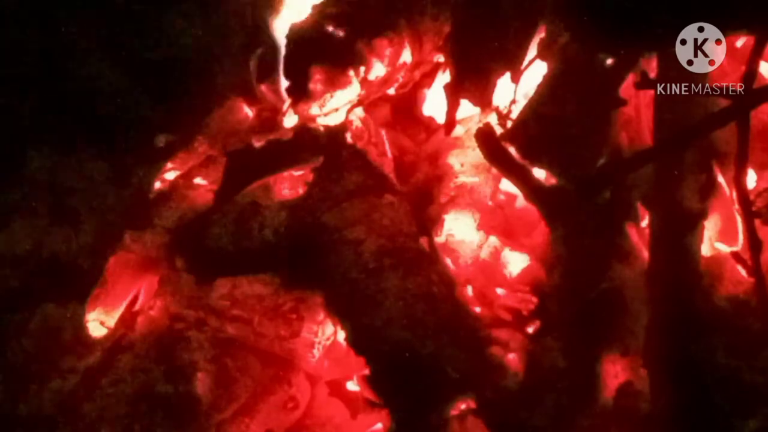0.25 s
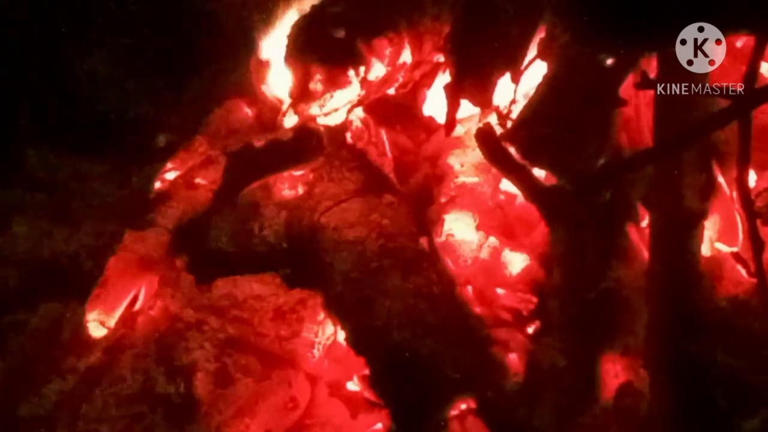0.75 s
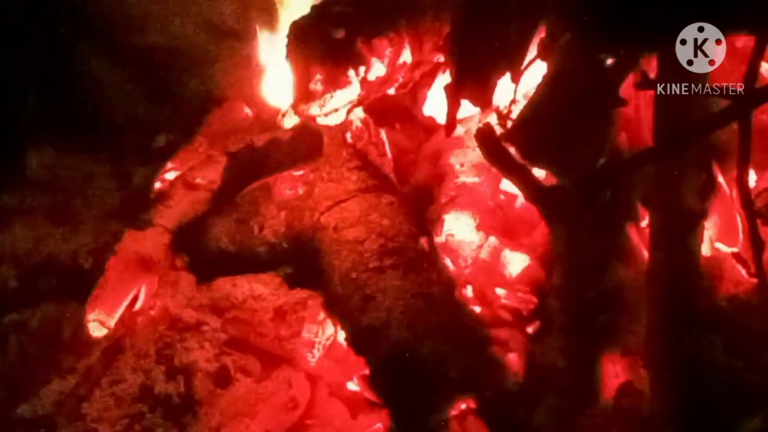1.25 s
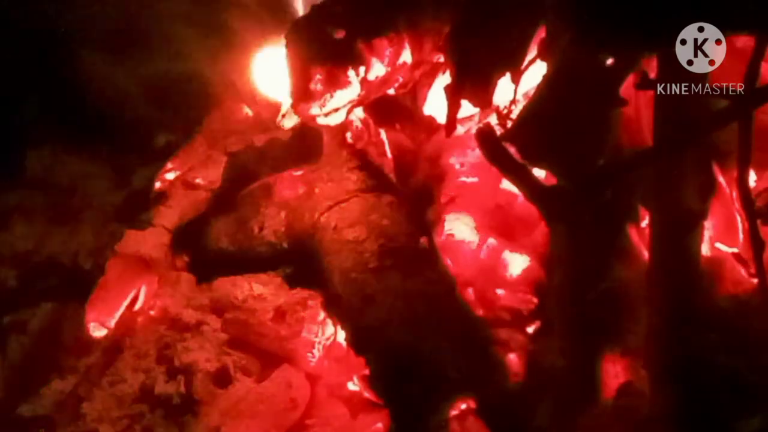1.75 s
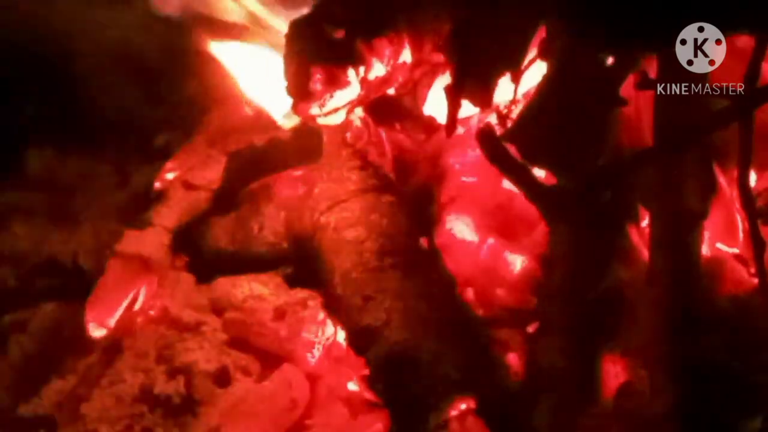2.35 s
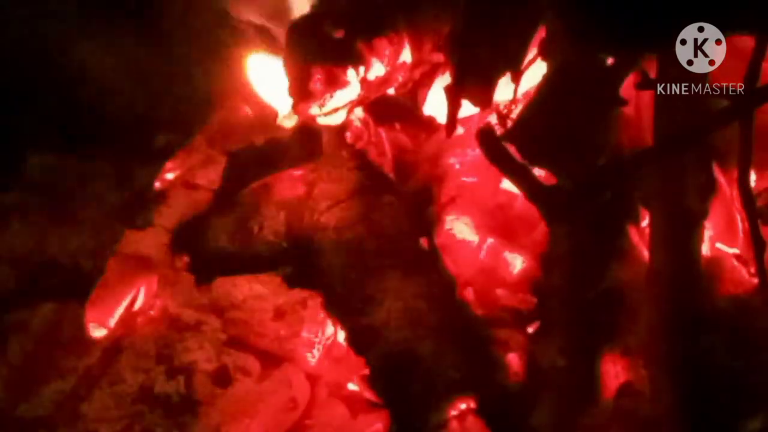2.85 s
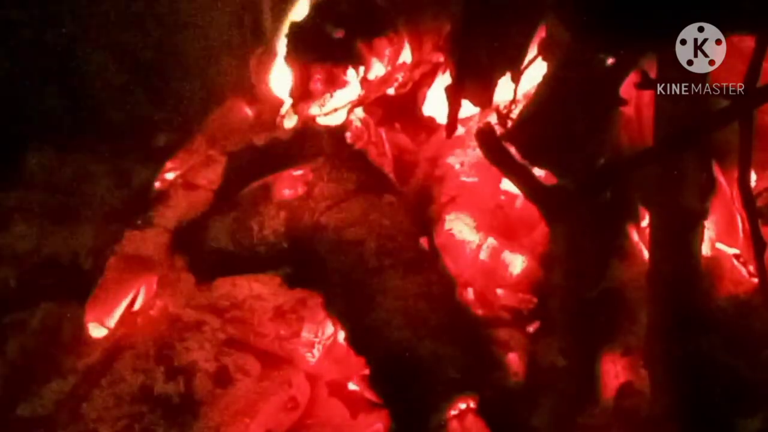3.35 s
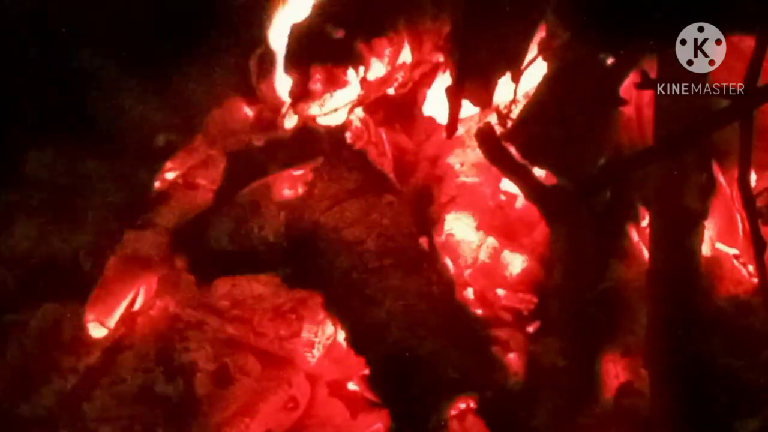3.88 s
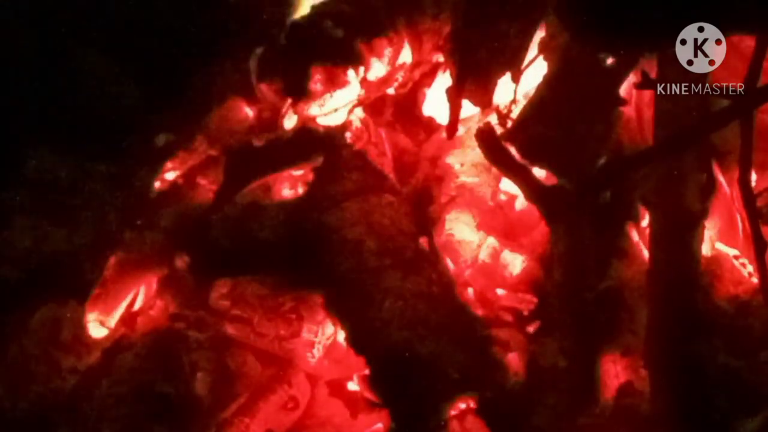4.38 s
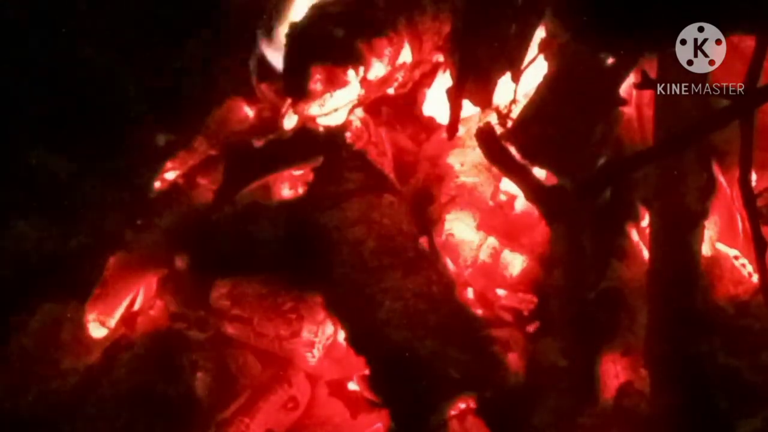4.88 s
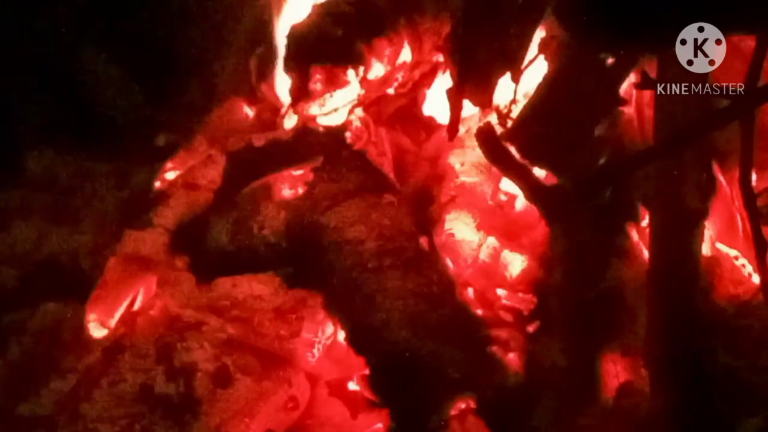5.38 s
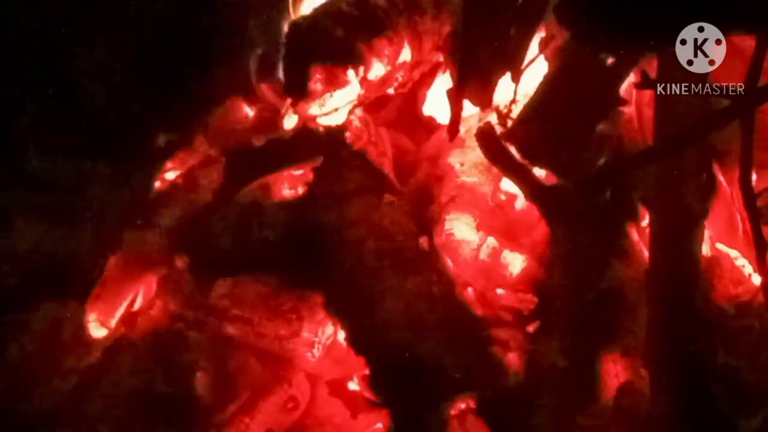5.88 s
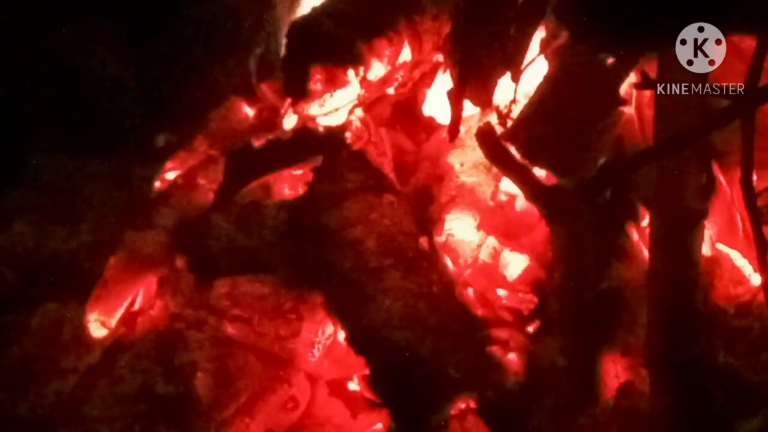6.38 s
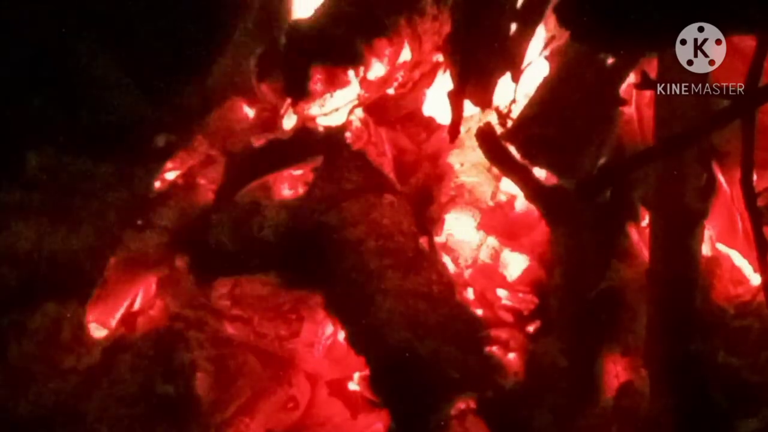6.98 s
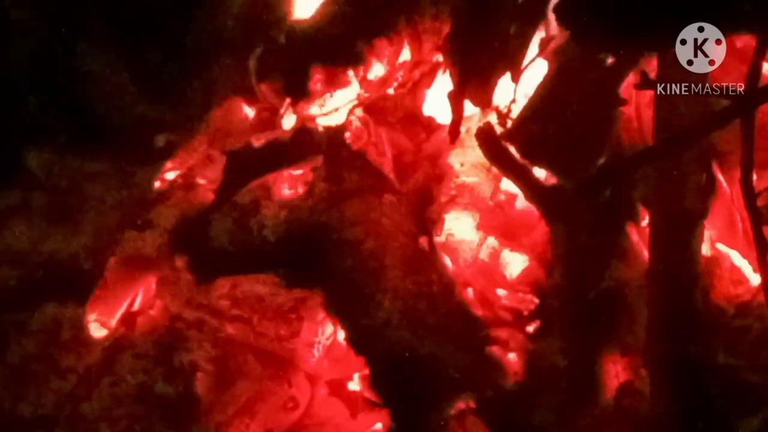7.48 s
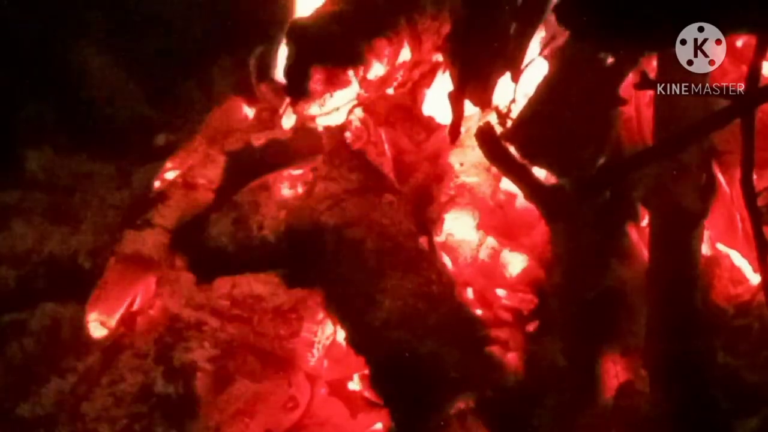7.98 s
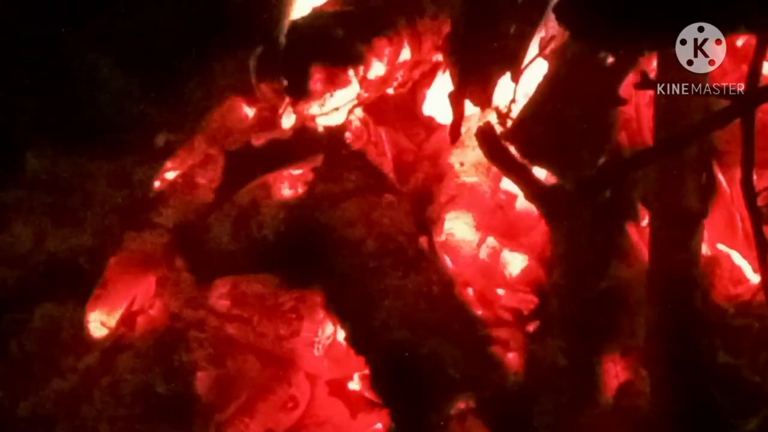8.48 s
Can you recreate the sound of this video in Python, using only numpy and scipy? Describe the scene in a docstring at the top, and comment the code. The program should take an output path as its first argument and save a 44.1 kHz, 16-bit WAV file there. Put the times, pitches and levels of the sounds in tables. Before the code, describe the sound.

A low campfire pops and crackles over a soft sizzle while crickets chirp steadily in the night woods.

```python
"""A low campfire in the woods at night, one microphone close to the embers.
Wood fibres snap in pops and ticks, and the ground and the trees throw each crack back.
Gas seeping from the hot wood sizzles, sap spits, and a small flame rumbles and flaps in faint night air.
A near cricket scrapes its wings in about three chirps a second, a quieter neighbour keeps step,
and a far chorus blurs into a trill among the trunks."""
import sys
import numpy as np
from scipy import signal
from scipy.fft import rfft, irfft
from scipy.io import wavfile
from scipy.ndimage import uniform_filter1d

SR = 44100
rng = np.random.default_rng(int(sys.argv[2]) if len(sys.argv) > 2 else 0)


def write(x):
    x = np.atleast_2d(x).T
    wavfile.write(sys.argv[1], SR, np.round(np.clip(x, -1, 1) * 32767).astype(np.int16))


N = 385434

# colour of escaping gas: (frequency [Hz], gain [dB])
HISS_COLOUR = [(2500, -26), (4000, -21), (4800, -9), (6200, -2), (7100, -0.5), (7650, -16), (8200, 0.5),
               (9200, -2), (11500, -5.5), (15500, -5.5)]


def undb(db):
    """Decibels to gain."""
    return np.exp(np.asarray(db) * (np.log(10) / 20))


def unit(x):
    """Scale to rms 1."""
    return x / np.sqrt(np.mean(x ** 2) + 1e-20)


def colour(x, points, size=4096):
    """Causal filter through (frequency [Hz], gain [dB]) points; white noise keeps its power."""
    hz, db = np.transpose(points)
    f = np.fft.rfftfreq(size, 1 / SR)
    gain = unit(undb(np.interp(np.log(f + 1), np.log(hz), db)))
    cepstrum = irfft(np.log(gain), size)
    cepstrum[1:size // 2] *= 2  # fold to minimum phase
    cepstrum[size // 2 + 1:] = 0
    return signal.oaconvolve(x, irfft(np.exp(rfft(cepstrum)), size))[:len(x)]


def walk(rate):
    """Random levels held 1 / rate s and smoothed twice, at rms 1."""
    k = max(int(SR / rate), 1)
    steps = np.repeat(rng.standard_normal(N // k + 1), k)
    return unit(uniform_filter1d(uniform_filter1d(steps, k), k)[:N])


def add(out, s, sound):
    """Mix a sound in at time s."""
    i = int(round(s * SR))
    a, b = max(i, 0), min(i + len(sound), N)
    if b > a:
        out[a:b] += sound[a - i:b - i]


def trees(x, t60, delay, grain_db):
    """Trunks and leaves scatter uneven, dying echoes back to the microphone; t60 and delay in s."""
    t = np.arange(SR // 2) / SR
    echoes = rng.standard_normal(len(t)) * undb(grain_db * rng.standard_normal(len(t)))
    echoes *= np.exp(-np.log(1000) * t / t60) * np.clip(t / delay - 1, 0, 1)
    return signal.oaconvolve(x, echoes / np.linalg.norm(echoes))[:N]


def scatter(x, t60, delay):
    """Countless echoes of a crack merge into noise that follows its fading energy."""
    t = np.arange(SR) / SR
    fade = undb(-60 * t / t60) ** 2 * np.clip(t / delay - 1, 0, 1)
    energy = signal.fftconvolve(x ** 2, fade / fade.sum())[:N]
    return np.sqrt(np.maximum(energy, 0)) * rng.standard_normal(N) * undb(1.87 * walk(350))


def ring(hz, cycles):
    """A struck splinter: a tone that swells and dies in a few cycles, with the energy of 1 ms at rms 1."""
    turns = hz * np.arange(SR // 50) / SR
    x = np.sin(2 * np.pi * turns) * np.exp(-turns / cycles) * np.minimum(turns, 1)
    return x * np.sqrt(SR / 1000) / np.linalg.norm(x)


def rustle(low_hz, high_hz, cycles, spread_db, count, pitches=24):
    """Many tiny grains at assorted pitches, smeared by the logs around them into a dry rustle."""
    out = np.zeros(N)
    grains = [ring(hz, cycles) for hz in np.geomspace(low_hz, high_hz, pitches)]
    when, pitch, chance = rng.random((count, 3)).T
    gains = undb(spread_db * np.minimum(-np.log(1 - chance), np.pi))
    for s, k, gain in zip(when * N / SR, (pitch * pitches).astype(int), gains):
        add(out, s, gain * grains[k])
    return unit(out + trees(out, t60=0.088, delay=0.0013, grain_db=1.5))


def gas_flow(attack_s=0.028, release_s=0.059, spurt_fizz_db=-16):
    """Strength of hiss and fizz: a slow seep plus spurts that swell fast and die away."""
    # gas seeping from the wood: (time [s], hiss level [dB], fizz level [dB])
    seep = [(0, -60, -83), (0.85, -61.5, -79.5), (1.1, -54, -73.5), (1.28, -53.5, -67.5), (1.5, -62, -81),
            (2.4, -60, -79), (2.95, -70, -83.5), (3.2, -56, -68), (3.85, -61, -77), (4.25, -57, -66.5),
            (4.45, -55.5, -79.5), (5.5, -60.5, -76), (5.9, -54.5, -67.5), (6.15, -60, -81), (7.2, -61, -78),
            (7.5, -63, -71.5), (7.75, -61.5, -82), (8.7, -63.5, -85.5)]
    # pockets of gas breaking out: (time [s], hiss level [dB])
    pockets = [(0.01, -53), (0.36, -64), (0.52, -54.5), (0.89, -48.5), (1.54, -69), (2.0, -57), (2.25, -50),
               (3.88, -54.5), (4.48, -58), (4.58, -61), (6.23, -49.5), (6.86, -51), (8.03, -50.5),
               (8.32, -57), (8.64, -56.5)]
    t = np.arange(N) / SR
    age = t[:SR]
    shape = np.minimum(age / attack_s, 1) * np.exp(-np.maximum(age - attack_s, 0) / release_s)
    spurts = np.zeros(N)
    for start, db in pockets:
        add(spurts, start, undb(db) * shape)
    s, hiss_db, fizz_db = np.transpose(seep)
    hiss_gain = np.hypot(undb(np.interp(t, s, hiss_db)), spurts)
    fizz_gain = np.hypot(undb(np.interp(t, s, fizz_db)), undb(spurt_fizz_db) * spurts)
    return hiss_gain, fizz_gain


def spits(per_s=16, spread_db=4):
    """Sap spits at random: each a bright tick with its own small echo."""
    clicks = np.zeros(N)
    for when, chance in rng.random((int(per_s * N / SR), 2)):
        gain = undb(spread_db * min(-np.log(1 - chance), 2))
        add(clicks, when * N / SR, gain * ring(hz=10000, cycles=1))
    return unit(clicks + colour(scatter(clicks, t60=0.14, delay=0.0022), HISS_COLOUR))


def sizzle(ticks_per_s=80, tick_spread_db=4):
    """Gas hisses from the wood, flickering; bursting cells tick, the charcoal rustles and tinkles."""
    # colour of the fizzing wood: (frequency [Hz], gain [dB])
    fizz_colour = [(700, -9), (1400, 0), (2300, -12), (3400, 0.5), (4600, 16), (7000, -19)]
    hiss_gain, fizz_gain = gas_flow()
    sizes = undb(tick_spread_db * np.minimum(rng.exponential(size=N), 3))
    ticks = sizes * rng.choice([-1, 1], N) * (rng.random(N) < ticks_per_s / SR)
    ticks = undb(-11) * unit(colour(ticks, [(3000, -33), (6000, -15), (9000, 13)]))
    grit = undb(-5) * rustle(low_hz=3960, high_hz=6150, cycles=2.7, spread_db=6.5, count=2200)
    hiss = colour(rng.standard_normal(N) * undb(walk(45) - 1.5), HISS_COLOUR)
    sap = undb(-7) * spits()
    fizz = undb(-6) * colour(rng.standard_normal(N) * undb(6.6 * walk(40)), fizz_colour)
    flakes = undb(-4) * rustle(low_hz=2090, high_hz=6450, cycles=2.2, spread_db=1.5, count=2600)
    tinkle = undb(-5.5) * rustle(low_hz=2600, high_hz=5600, cycles=10, spread_db=3.8, count=800)
    return hiss_gain * (hiss + ticks + sap) + fizz_gain * (fizz + flakes + grit + tinkle)


def flame(rumble_db=-51, flutter_db=1.53, flap_s=0.057, sputter_db=-82):
    """A small flame close to the microphone rumbles, flaps briefly and sputters softly."""
    # colour of the steady flame: (frequency [Hz], gain [dB])
    rumble_colour = [(20, -35), (35, -24), (50, -11), (70, 1), (88, -3), (115, -0.5), (150, -7.5),
                     (200, -11.5), (250, -20), (320, -26.5), (420, -34.5), (800, -39.5), (2000, -75)]
    # flaps of the flame: (time [s], level [dB])
    flap_peaks = [(0.214, -61), (0.41, -59.5), (0.886, -70), (1.208, -64), (2.094, -63), (2.317, -58),
                  (3.688, -60), (4.307, -60.5), (4.495, -58), (5.563, -59.5), (5.914, -54.5), (6.29, -58.5),
                  (7.55, -58)]
    # colour of a flap: (frequency [Hz], gain [dB])
    flap_colour = [(100, -23), (190, 2.5), (260, 0.5), (340, -6), (450, -19.5), (800, -20.5), (1400, -32),
                   (3000, -49)]
    t = np.arange(N) / SR
    rumble = unit(colour(rng.standard_normal(N), rumble_colour))
    rumble *= undb(rumble_db + flutter_db * walk(15))
    swell = sum(undb(db) / (1 + ((t - s) / flap_s) ** 2 / 2) ** 2 for s, db in flap_peaks)
    flaps = swell * colour(rng.standard_normal(N), flap_colour)
    grains = rustle(low_hz=480, high_hz=1500, cycles=3, spread_db=3.5, count=700)
    sputter = undb(sputter_db + 2 * walk(7)) * grains
    return rumble + flaps + sputter


def night_air(level_db=-73.5):
    """The faint, wavering hush of the woods behind the fire."""
    # colour of the air: (frequency [Hz], gain [dB])
    air_colour = [(500, -9.5), (800, -3), (1200, -3), (2000, -7.5), (4000, -31.5), (15000, -7.5)]
    return colour(rng.standard_normal(N), air_colour) * undb(level_db + walk(13))


def chirp(hz, strokes_per_s=21, stroke_s=0.0252, fall_hz=200, count=4):
    """Wing strokes: the tone sags as the scraper slows along the file; the last stroke drops 5 dB."""
    out = np.zeros(N // 20)
    along = np.arange(int(stroke_s * SR)) / (stroke_s * SR)
    for k, (late, sharp, loud) in enumerate(rng.standard_normal((count, 3))):
        tone_hz = hz + 30 * sharp - fall_hz * (along - .5)
        stroke = np.abs(np.sin(np.pi * along)) ** .5 * np.sin(2 * np.pi * np.cumsum(tone_hz) / SR)
        i = max(int((k / strokes_per_s + .003 * late) * SR), 0)
        out[i:i + len(along)] += stroke * undb(loud - 5 * (k == count - 1))
    return 2 * out


def cricket_beat(first_chirp_s=0.075):
    """The near cricket's rhythm: a running count of chirps at every sample, and the time of each."""
    # its pace: (time [s], rate [chirps/s])
    pace = [(0, 3.241), (2, 3.792), (2.8, 3.05), (4.9, 3.622), (5.5, 3.083), (8.7, 3.119)]
    t = np.arange(N) / SR
    beat = np.cumsum(np.interp(t, *np.transpose(pace))) / SR
    beat -= np.interp(first_chirp_s, t, beat)
    return beat, np.interp(np.arange(int(beat[-1]) + 1), beat, t)


def crickets(wing_hz=6584, drift_hz_per_s=13.26, lead_s=.03, swell_db=4, lag_beats_per_octave=1.9):
    """A near cricket and a neighbour chirp in step; far ones swell with them, blurred by the trees."""
    # the near cricket's effort: (time [s], relative level [dB])
    effort = [(0, -44), (1, -44.5), (1.6, -46.5), (3.6, -49.5), (4, -45.5), (5.6, -46.5), (6.3, -47.5),
              (6.8, -70), (7.6, -47.5), (8.7, -48)]
    # far crickets: (wing tone [Hz], relative level [dB], rate [chirps/s])
    chorus = [(6630, -68.5, 3), (6457, -61.5, 3.1), (6663, -58, 2.7), (6826, -62, 3.1), (6940, -72.5, 4)]
    near, neighbour, far = np.zeros((3, N))
    beat, starts = cricket_beat()
    for s in starts:
        db = np.interp(s, *np.transpose(effort)) + .5 * rng.standard_normal()
        hz = wing_hz + drift_hz_per_s * s + 25 * rng.standard_normal()
        add(near, s, undb(db) * chirp(hz))
        add(neighbour, s - lead_s, undb(db - 16) * chirp(hz=6830, fall_hz=318))
    for hz, db, pace in chorus:
        song = np.zeros(N)
        for s in np.cumsum(1 + 0.13 * rng.standard_normal(32)) / pace - 2 / pace:
            add(song, s, chirp(hz, strokes_per_s=23, stroke_s=0.034, fall_hz=110, count=7))
        lag = lag_beats_per_octave * np.log2(hz / wing_hz)  # higher voices swell later
        swell = undb(swell_db * np.sin(2 * np.pi * (beat - lag)))
        far += undb(db - 0.2) * unit(song * swell)
    near = undb(-9) * (near + trees(near, t60=0.3, delay=0.0047, grain_db=1.0))
    return near + trees(far + neighbour, t60=0.42, delay=0.0014, grain_db=4.5)


def snap(rise_s, decay_s, rattle_s, rattle_db):
    """A fibre snaps: a sudden rough pulse and a short rattle, with the energy of 1 ms at rms 1."""
    t = np.arange(SR // 30) / SR
    shape = np.minimum(t / rise_s, 1) ** 2 * np.exp(-np.maximum(t - rise_s, 0) / decay_s)
    shape += undb(rattle_db) * np.exp(-t / rattle_s) * (t > rise_s)
    x = shape * rng.standard_normal(len(t))
    return x * np.sqrt(SR / 1000) / np.linalg.norm(x)


def embers(bounce_s=0.0069, ring_db_per_octave=3.5):
    """Each pop, a bright crack and a woody body, bounces off the ground and spreads among the trees."""
    # pops: (time [s], crack level [dB], body level [dB], wood ring [Hz], echo relative to the pop [dB])
    pops = [(0.183, -45, -70, 1800, -1), (1.6492, -39, -43.5, 3680, -6.5), (1.7097, -31.5, -78, 3900, -19),
            (2.0067, -45, -75, 4400, -15), (2.27, -45, -72, 4600, -10), (2.4642, -42.5, -60, 1820, -1),
            (2.523, -41.5, -47.5, 3800, 0.5), (2.8164, -38, -80, 1800, -10),
            (3.009, -47.5, -54.5, 2920, 9.5), (3.076, -34, -51, 4400, -7), (3.2432, -36.5, -72, 4100, -12),
            (3.2744, -41.5, -49, 3350, 7.5), (3.32, -38, -46.5, 3300, -8), (3.4792, -35, -43, 4570, -14),
            (3.5077, -42, -68, 3700, -17), (4.0633, -33, -44, 4400, -4), (4.113, -33, -63, 4600, -7),
            (4.862, -23.5, -42.5, 4600, 0), (4.9938, -42, -39.5, 4170, -5), (5.076, -22, -26.5, 3320, -5.5),
            (5.118, -19.5, -21, 5500, -6), (5.124, -21.5, -34.5, 2080, 0), (5.1765, -35, -36.5, 3340, 5),
            (5.183, -31, -39, 3330, 0), (5.357, -32, -74, 4600, -32), (5.5447, -31.5, -41.5, 3800, -5),
            (5.839, -38.5, -44.5, 2960, 0), (5.9923, -32, -45.5, 6800, -2.5), (6.01, -60, -49.5, 2360, 6),
            (6.096, -43.5, -50, 3630, 1), (6.2649, -38.5, -45.5, 2780, 0.5), (6.288, -59, -42.5, 2700, -5),
            (6.3098, -48, -44, 2640, -2), (6.4214, -36.5, -45.5, 2620, -2), (6.5682, -15, -21, 2270, -6),
            (6.5705, -21.5, -31.5, 1370, 2.5), (6.5765, -22, -27.5, 3270, -8),
            (7.2732, -34.5, -45.5, 4360, -4), (7.3723, -31, -42, 1830, -2), (7.463, -36, -47, 4440, 1),
            (7.48, -35, -44, 4560, 1), (7.6458, -37, -53, 4500, -0.5), (7.9764, -43, -56, 4630, -15),
            (8.026, -47.5, -57, 4500, 8)]
    # colour of the bright crack: (frequency [Hz], gain [dB])
    crack_colour = [(2500, -43), (4300, -16), (5600, -3), (6600, 0), (7400, -8), (8400, 3.5), (10000, 0.5),
                    (12500, -0.5), (15500, -5.5)]
    # colour of the woody body: (frequency [Hz], gain [dB])
    body_colour = [(500, -43), (1000, -17), (1400, -10), (1750, -7), (2100, -4), (3400, 2), (4200, 6.5),
                   (5500, 12), (8000, -22)]
    # colour of what the trees throw back: (frequency [Hz], gain [dB])
    echo_colour = [(800, -6.5), (2500, -2), (5000, -5), (7400, 0), (8400, -0.5), (12000, 1.5),
                   (15500, -1.5)]
    direct, sent = np.zeros((2, 3, N))  # rows: crack, body, wood ring
    for s, crack_db, body_db, hz, echo_db in pops:
        length_s = 0.00059 * undb((crack_db + 20) / 2)  # a small fracture is over sooner
        crack = undb(crack_db) * snap(length_s / 2, length_s, rattle_s=4 * length_s, rattle_db=-14)
        body = undb(body_db - 2) * snap(rise_s=.0004, decay_s=.0009, rattle_s=.005, rattle_db=-11)
        # short splinters ring higher and louder
        wood = undb(body_db - 5.5 + ring_db_per_octave * np.log2(hz / 3000)) * ring(hz, cycles=4.3)
        for k, part in enumerate((crack, body, wood)):
            add(direct[k], s, part)
            add(sent[k], s, undb(echo_db) * part)
        bounce = snap(rise_s=.0008, decay_s=.002, rattle_s=.005, rattle_db=-14)
        add(direct[0], s + bounce_s, undb(crack_db + echo_db - 6) * bounce)
    out = direct[2] + undb(-5) * trees(sent[2], t60=0.085, delay=0.0033, grain_db=-2.5)
    for close, outgoing, points in zip(direct, sent, (crack_colour, body_colour)):
        near_echo = undb(-4) * scatter(outgoing, t60=0.089, delay=0.0017)
        far_echo = undb(-1) * scatter(outgoing, t60=0.52, delay=0.0018)
        out += colour(close + colour(near_echo + far_echo, echo_colour), points)
    # the pops carry no bass below about 900 Hz
    return signal.sosfilt(signal.butter(3, 900, "high", fs=SR, output="sos"), out)


def scene():
    """The fire close to the microphone and the crickets beyond it, in mono."""
    return (embers() + sizzle() + flame() + night_air() + crickets())[None]


def record(dry):
    """The recorder cuts the treble steeply above 15.6 kHz."""
    return signal.sosfilt(signal.ellip(10, .2, 70, 15600, fs=SR, output="sos"), dry)


dry = scene()
out = record(dry)
write(out)
```